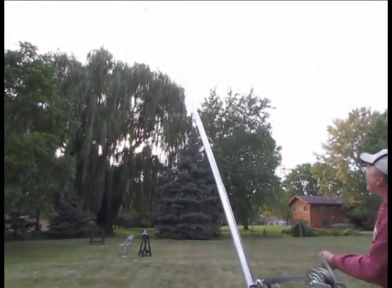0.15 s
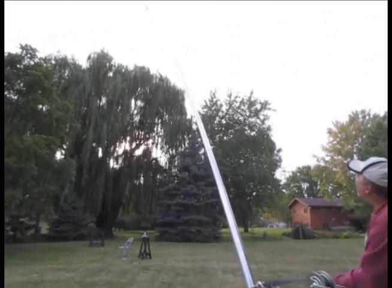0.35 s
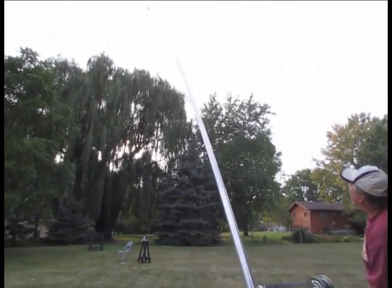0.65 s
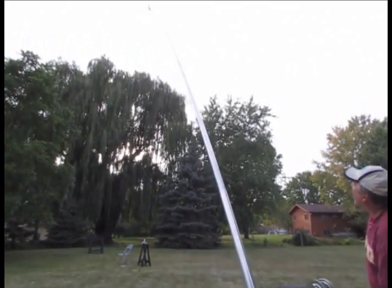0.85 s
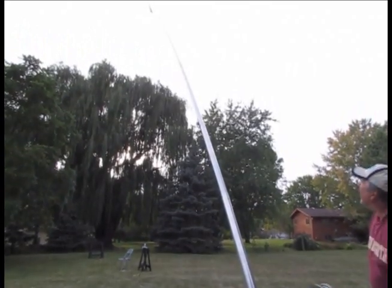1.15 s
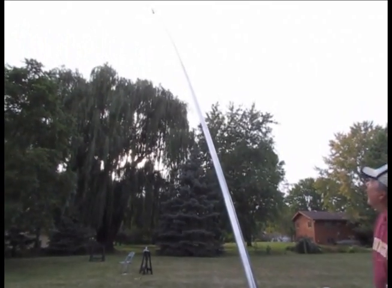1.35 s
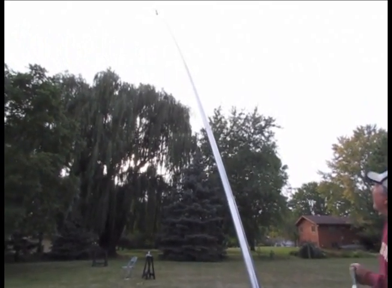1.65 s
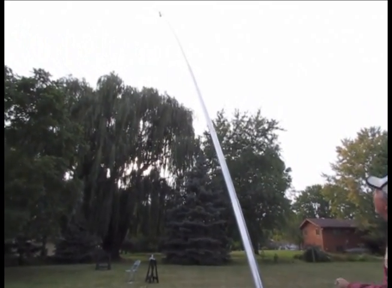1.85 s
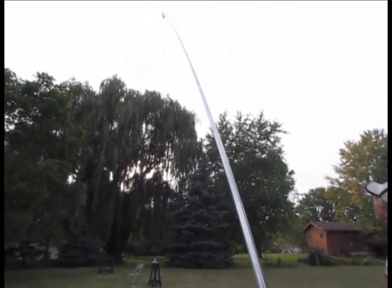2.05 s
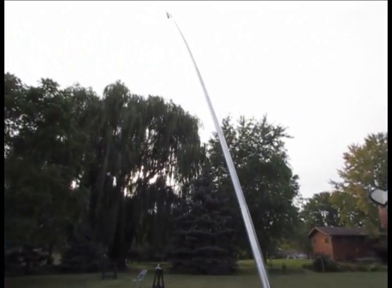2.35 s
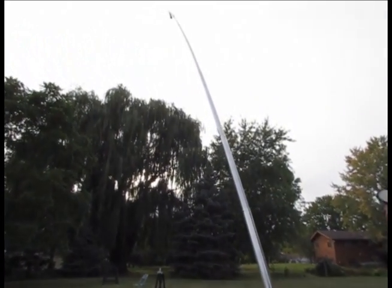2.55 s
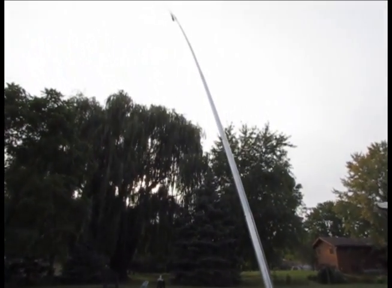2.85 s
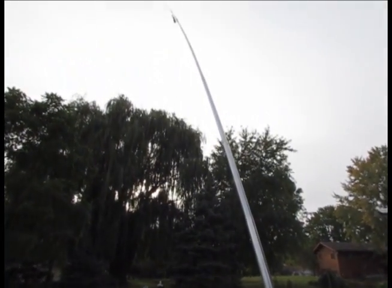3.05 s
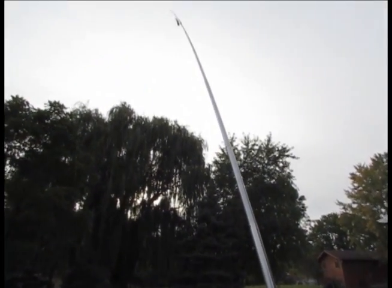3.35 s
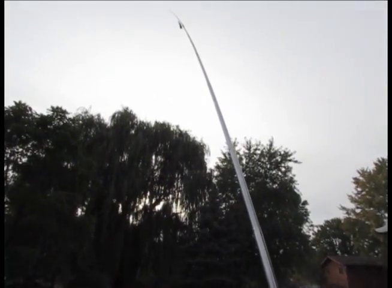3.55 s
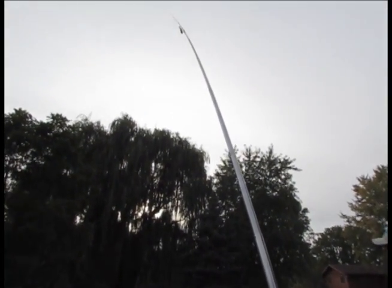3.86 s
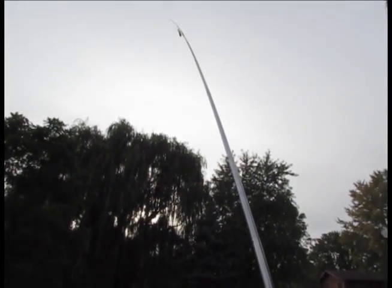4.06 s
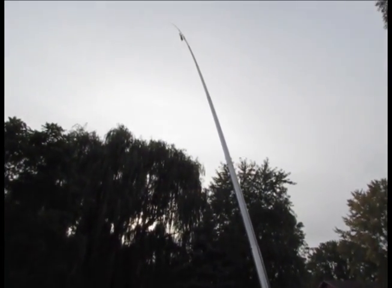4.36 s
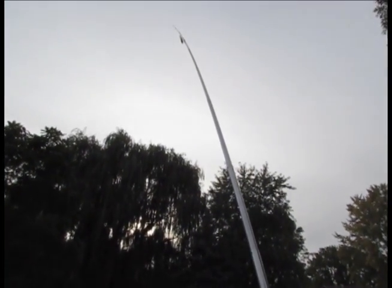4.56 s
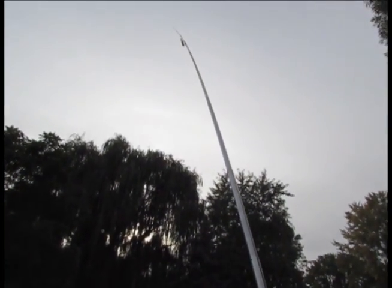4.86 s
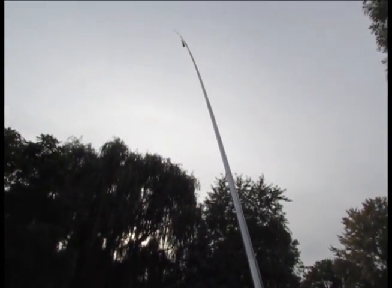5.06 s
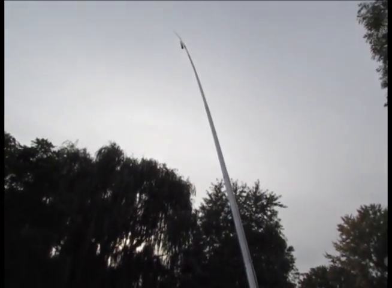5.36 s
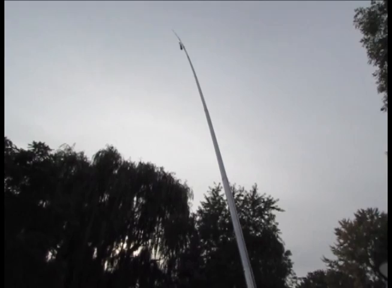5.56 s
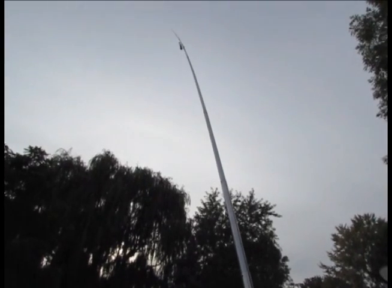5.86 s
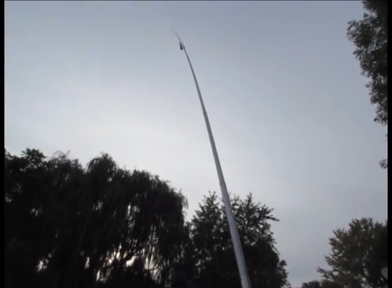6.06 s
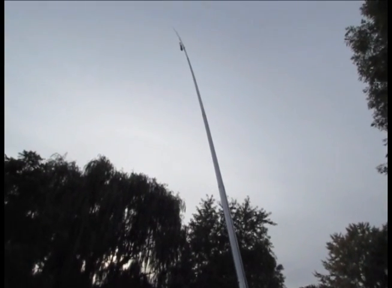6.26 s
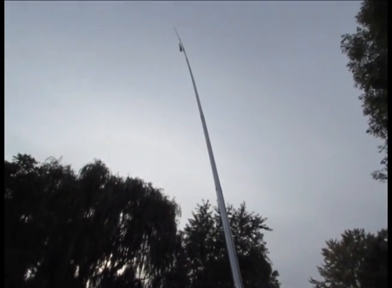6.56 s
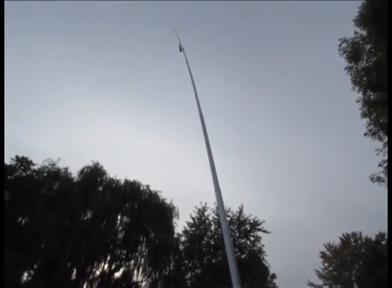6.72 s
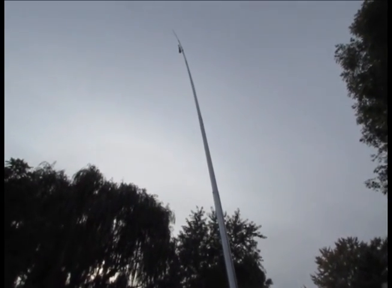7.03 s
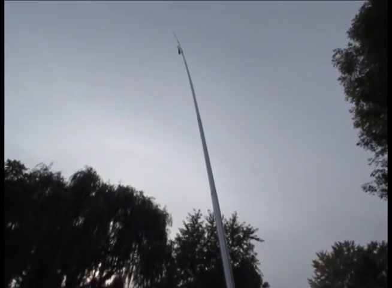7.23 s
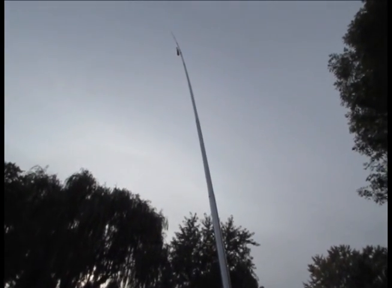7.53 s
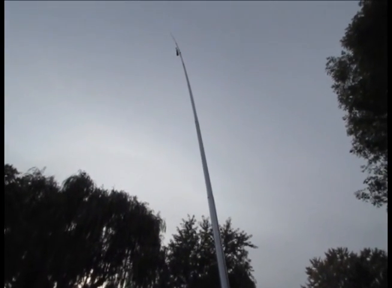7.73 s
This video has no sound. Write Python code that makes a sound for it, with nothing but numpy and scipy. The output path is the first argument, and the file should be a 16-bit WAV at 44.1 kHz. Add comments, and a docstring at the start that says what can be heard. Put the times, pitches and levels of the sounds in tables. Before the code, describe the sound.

Outdoors in a quiet yard, soft airy rush and a very faint low hum lie under a close hand winch. From 0.06 seconds to the end near 7.9, its pawl clacks over steel teeth, about eight or nine times a second with small irregularities. Every clack is a short scrape, a hard bright snap and a few milliseconds of chatter, coloured by a resonant steel frame. The first clicks are slightly weaker and brightest; the top softens by 2 seconds. Pace quickens around 3.5 to 3.9, then slows to about seven per second from 6 seconds, with weaker clicks after 7. Tone swells and thins with each crank turn. Faint ringing and gear rattle fill the gaps. Dull hollow knocks fall at 0.6 and 4.6; mast pings stand out near 1.9 and 2.9, fainter ones elsewhere. The winch sits slightly right, drifting towards centre late, with a short noisy tail, faint tree wash and distant slap echo.

```python
"""Quiet outdoor air and a low hum open the scene, and at once a hand winch under load raises a metal mast.
Its pawl scrapes up each ratchet tooth, drops and chatters: bursts of noise coloured by the steel frame.
Wheel and mast ring on faintly, gears rattle softly, and a few dull knocks and mast pings stand out.
Clicks turn fuller and thinner with every turn of the crank, and fill out as it speeds up.
The yard adds a short noise tail, a faint wash from the trees and one far echo."""
import sys
import numpy as np
from scipy import signal
from scipy.fft import rfft, irfft
from scipy.io import wavfile

SR = 44100
rng = np.random.default_rng(int(sys.argv[2]) if len(sys.argv) > 2 else 0)


def pcm_store(signal):
    """Save signal as 16-bit PCM."""
    levels = np.round(np.clip(np.atleast_2d(signal), -1, 1) * 32767)
    wavfile.write(sys.argv[1], SR, levels.astype(np.int16).T)


N = 347949
TIME = np.arange(N) / SR
TEETH = 15  # teeth on the ratchet wheel: one turn of the crank

# Where the pawl may land; one resonance stands out in each range:
# lowest_hz [Hz], highest_hz [Hz], width_hz [Hz], boost_db [dB]
SEAT_RANGES = [(2595, 4240, 117, 3), (5100, 8380, 310, 4.5), (10640, 13600, 240, 4)]


def amp(db):
    """Decibels to gain."""
    return 10 ** (np.asarray(db) / 20)


def read(points, hz):
    """A spectrum table, joined by straight lines over log frequency."""
    f, value = np.transpose(points)
    return np.interp(np.log(hz + 1), np.log(f + 1), value)


def glide(points, t):
    """A table of (s, value), joined by straight lines over time."""
    return np.interp(t, *np.transpose(points))


def add(mix, s, sound):
    """Mixes a sound in at time s."""
    part = mix[..., max(round(s * SR), 0):][..., :sound.shape[-1]]
    part += sound[..., :part.shape[-1]]


def bump(f, hz, width):
    """Bell of height 1 around a resonance."""
    return 1 / (1 + (2 * (f - hz) / width) ** 2)


def causal(db):
    """Minimum-phase response with the given gain: it rings only after the blow."""
    log_gain = np.log(amp(np.concatenate([db, db[-2:0:-1]])))
    return np.exp(np.conj(signal.hilbert(log_gain)))[:len(db)]


def widen(common, apart, same):
    """Left and right from two unrelated signals; same is their likeness, 0-1."""
    same = np.clip(same, 0, 1)
    return np.sqrt((1 + same) / 2) * common + np.sqrt((1 - same) / 2) * np.array([apart, -apart])


def air(same=0.82, hum_hz=100, waver_hz=1.23):
    """Air as shaped noise whose whole rush slowly swells, its lowest part a little less; a wavering hum."""
    # Noise density of the air: pitch_hz [Hz], density_db [dB per Hz], before the swell
    air_density = [(20, -106), (60, -96.5), (120, -93), (180, -99), (300, -93), (480, -100), (900, -99),
                   (2000, -102), (5000, -100), (8000, -105), (13000, -110), (16000, -125)]
    # Rise and fall of the rush: time_s [s], gain_db [dB]
    air_swell = [(0, 7.5), (.8, 0.5), (2.5, 1), (3.3, -0.5), (4.8, 1.5), (5.5, 3.5), (7, 0.5), (7.9, -1)]
    # Far hum: time_s [s], level_db [dB RMS]
    hum_level = [(0, -79), (1.2, -74.5), (2.5, -79), (3.5, -84), (7.9, -91)]
    f = np.fft.rfftfreq(N, 1 / SR)
    spectrum = rfft(rng.standard_normal((2, N))) * amp(read(air_density, f)) * np.sqrt(SR / 2)
    swelling_share = read([(400, 0.79), (1200, 1)], f)
    swelling = irfft(spectrum * swelling_share, N) * amp(glide(air_swell, TIME))
    steady = irfft(spectrum * (1 - swelling_share), N)
    common, apart = swelling + steady
    waver = np.interp(TIME, np.linspace(0, TIME[-1], 32), rng.standard_normal(32))
    hum = np.sqrt(2) * np.sin(2 * np.pi * np.cumsum(hum_hz + waver_hz * waver) / SR)
    hum *= amp(glide(hum_level, TIME))
    return widen(common, apart, same) + hum


def gears(per_s=22, tick_db=-48, ring_s=0.01, rise_s=0.00078, spread_db=8, size=2048):
    """Slack in the loaded gears makes faint soft rattles at random moments: band-passed noise puffs."""
    t = np.arange(size) / SR
    hits = (rng.random(N) < per_s / SR) * amp(spread_db * (rng.random(N) - .5))
    puff = np.exp(-t / ring_s) * (1 - np.exp(-t / rise_s))
    envelope = signal.oaconvolve(hits, puff)[:N]
    band = signal.butter(2, [2200, 6500], "bandpass", fs=SR)
    return amp(tick_db) * signal.lfilter(*band, envelope * rng.standard_normal((2, N)))


def frame_colour(f, progress, seat_db=0.76, detune=0.018):
    """Gain of the steel frame in dB; each tooth loads its resonances a little differently."""
    # Broad colour of the struck winch: pitch_hz [Hz], gain_db [dB]
    steel = [(100, -42), (400, -28.5), (620, -22.5), (800, -17), (1900, -10), (2500, -1.5), (3300, -3.5),
             (5800, 2.5), (8300, -4), (11400, -8.5), (12700, -4.5), (14600, -11.5), (16000, -34)]
    # Damped resonances, shifting in strength as the mast rises:
    # pitch_hz [Hz], width_hz [Hz], start_db [dB], end_db [dB], each before the chance per tooth
    resonances = [(747.6, 150, 13, 10.5), (840, 30, 3.5, 4), (1110, 45, 2.5, -1.5), (1417, 110, 10, 4),
                  (1560, 204, 2.5, 12), (2325, 130, 4, 7.5), (2775, 138, 11, 6), (3872, 270, 8, 9),
                  (4804, 76, 11, 8.5), (5560, 220, 2, 5), (6420, 930, 0, 3), (7310, 280, 3.5, 2.5),
                  (9110, 194, 7, 8), (9930, 180, 9.5, 8.5)]
    hz, width, start_db, end_db = np.transpose(resonances)
    chance = rng.standard_normal((len(resonances), 2))
    db = start_db + (end_db - start_db) * progress + seat_db * chance[:, 0]
    return read(steel, f) + bump(f[:, None], hz * (1 + detune * chance[:, 1]), width) @ db


def blow_colour(f, tooth, pace, heavy_tooth=14):
    """Colour of one blow in dB: fuller on the heavy side of the turn and when the crank runs fast."""
    # Colour by band: pitch_hz [Hz], mean_db [dB], heavy_db [dB at the tooth where the crank bears hardest],
    # pace_db [dB per doubling of pace], chance_db [dB, standard deviation]
    blow = [(740, -0.5, 0.7, 1.3, 0.5), (1260, 1.7, 2.5, -0.5, 0.85), (3000, 1.04, 0.1, 2, 0.55),
            (6250, 0.62, 0.15, 0, 0.4), (11500, 1.15, 0.4, 0.3, 0.65)]
    hz, mean_db, heavy_db, pace_db, chance_db = np.transpose(blow)
    heavy = np.cos(2 * np.pi * (tooth - heavy_tooth) / TEETH)
    db = mean_db + heavy * heavy_db + pace * pace_db + chance_db * rng.standard_normal(len(hz))
    return read(np.column_stack([hz, db]), f)


def seat_colour(f, wear, slip=0.23):
    """Each tooth seats the pawl in its own way, a little differently at every turn."""
    low_hz, high_hz, width, db = np.transpose(SEAT_RANGES)
    place = np.clip(wear + slip * (rng.random(len(SEAT_RANGES)) - .5), 0, 1)
    return bump(f[:, None], low_hz * (high_hz / low_hz) ** place, width) @ db


def chatter(t, length, count=6, contact_s=0.00046, bounce_db=-5, loss_db=2.5):
    """Force of one tooth: the drop of the pawl, then uneven, on the whole weakening bounces."""
    ring_s, ring_share, uneven_db = .0032, .28, 9  # each blow shakes the frame for a while
    chance = rng.random((count, 2))
    bounces = (np.arange(count) + .3 + .7 * chance[:, 0]) / count * length * 1.6
    sizes = amp(bounce_db + uneven_db * chance[:, 1] - loss_db * bounces / length)
    age = t - np.append(0, bounces)[:, None]
    since = np.maximum(age, 0)
    blows = (age >= 0) * (np.exp(-since / contact_s) + ring_share * np.exp(-since / ring_s))
    return np.sqrt(np.append(1, sizes) ** 2 @ blows)  # blows add as energy


def ratchet(size=4096, scrape_s=0.0033, hard_s=0.0048):
    """Every tooth excites the steel frame; two versions of the rattle share timing but not noise."""
    # Drops of the pawl: start_s [s], level_db [dB RMS over 25 ms, before the winch gain],
    # chatter_s [s, sets the spacing and fading of the bounces]
    drops = [(0.0636, -22, 0.0087), (0.1843, -22, 0.0037), (0.299, -22, 0.0017), (0.4039, -22.5, 0.0027),
             (0.516, -22.5, 0.0071), (0.6102, -22.5, 0.0068), (0.7056, -21.5, 0.0099),
             (0.8396, -21, 0.0059), (0.9873, -20.5, 0.0082), (1.1171, -21, 0.0052), (1.2343, -19.5, 0.0053),
             (1.3384, -20.0, 0.0059), (1.4466, -20.0, 0.0073), (1.5645, -21, 0.0064), (1.6818, -20, 0.0058),
             (1.793, -20.5, 0.0068), (1.8964, -21.5, 0.0057), (2.0036, -21.5, 0.0071),
             (2.0996, -20.5, 0.0064), (2.198, -20.5, 0.0086), (2.3055, -19.5, 0.0086),
             (2.3971, -19, 0.0071), (2.5073, -19.5, 0.0071), (2.6354, -20, 0.007), (2.7638, -20.5, 0.0075),
             (2.8892, -20, 0.0052), (2.9995, -20, 0.0061), (3.109, -19.5, 0.0063), (3.2421, -21.5, 0.006),
             (3.3519, -21.5, 0.0051), (3.452, -21, 0.0068), (3.545, -21.5, 0.0061), (3.6305, -21, 0.0065),
             (3.7136, -20, 0.008), (3.7971, -19.5, 0.0078), (3.889, -19.5, 0.0061), (3.9898, -20.5, 0.0054),
             (4.1142, -20, 0.0079), (4.2543, -20.5, 0.0059), (4.3827, -20.5, 0.0087), (4.4955, -19, 0.0062),
             (4.6002, -20.0, 0.005), (4.6986, -19.5, 0.0053), (4.8205, -21, 0.0056),
             (4.9362, -20.5, 0.0067), (5.0551, -21, 0.0095), (5.1637, -19.5, 0.0076),
             (5.2734, -20.5, 0.0066), (5.3868, -20, 0.0073), (5.5111, -19, 0.0072), (5.6317, -18, 0.0064),
             (5.743, -19.0, 0.01), (5.8843, -19.0, 0.0085), (6.0465, -19, 0.0052), (6.196, -19.5, 0.0062),
             (6.347, -19, 0.0074), (6.4945, -20, 0.007), (6.6377, -19, 0.0027), (6.784, -20.5, 0.0085),
             (6.9112, -19.5, 0.0064), (7.0273, -21.5, 0.0038), (7.1526, -22.5, 0.0051),
             (7.2788, -22, 0.0045), (7.4127, -22.5, 0.0085), (7.5592, -21.5, 0.005),
             (7.7102, -21.5, 0.0063), (7.8542, -20.5, 0.0052)]
    lead_in, span = .012, .025  # s of scrape room before the drop, s over which level is set
    usual_pace = 8.5  # teeth per s
    scrape_mean_db, scrape_pace_db, scrape_chance_db = -20, 4, 5  # pace: dB per doubling
    hard_share = [(3000, 0), (7000, 0.42), (13000, 0.99)]  # Hz, extra share
    scrape_tone = [(1000, 3.5), (2500, 3), (6000, 1), (12000, -5)]  # Hz, dB
    t, f = np.arange(size) / SR - lead_in, np.fft.rfftfreq(size, 1 / SR)
    out = np.zeros((2, N))
    wear = rng.random((TEETH, len(SEAT_RANGES)))
    paces = -np.log2(np.gradient(np.transpose(drops)[0]) * usual_pace)  # doublings of the usual pace
    for tooth, ((s, db, length), pace) in enumerate(zip(drops, paces)):
        colour_db = frame_colour(f, s / TIME[-1])
        colour_db = colour_db + blow_colour(f, tooth, pace)
        colour_db = colour_db + seat_colour(f, wear[tooth % TEETH])
        grit = rng.standard_normal((2, size))
        blows = chatter(t, length) * grit
        # the first drop is the hardest contact, so it carries most of the top
        hard = rfft(blows * np.exp(-abs(t) / hard_s)) * read(hard_share, f)
        # riding up the tooth is a softer, duller contact that swells until the drop
        scrape_db = scrape_mean_db + scrape_pace_db * pace + scrape_chance_db * rng.standard_normal()
        climb = (t < 0) * np.exp(-abs(t) / scrape_s) * grit
        scrape = rfft(climb) * amp(scrape_db + read(scrape_tone, f))
        click = irfft((rfft(blows) + hard + scrape) * causal(colour_db))
        rms = np.sqrt((click ** 2).sum(1, keepdims=True) / (span * SR))
        add(out, s - lead_in, amp(db) * click / rms)
    return out


def ringing(clicks):
    """Lightly damped modes of wheel and mast, driven by the clicks, sing on between them."""
    # Long modes: pitch_hz [Hz], start_db [dB gain], end_db [dB gain], t60_s [s]
    long_modes = [(782, -62, -63, .25), (1410, -65, -66, .22), (1510, -74, -62, .2), (1970, -71, -75, 1.0),
                  (2200, -70, -85, .6), (2970, -84, -66, .6), (3138, -73, -70, 1.0), (4075, -66, -80, .6),
                  (4668, -68, -76, .7), (6490, -73, -76, .5), (8580, -74, -76, .6), (13520, -69, -70, .4)]
    t, out = np.arange(SR) / SR, np.zeros((2, N))
    for hz, start_db, end_db, t60 in long_modes:
        mode = amp(-60 * t / t60) * np.sin(2 * np.pi * hz * t)
        sung = signal.oaconvolve(clicks, mode[None], axes=1)[:, :N]
        out += amp(np.linspace(start_db, end_db, N)) * sung
    return out


def ports(pair, lead_ahead=.6, lead_per_db=0.1555, detour_from_db=1.0, detour_per_db=1.0):
    """The winch stands off to the side: the two ports differ in phase, level and fine detail."""
    # Likeness of the two ports: pitch_hz [Hz], likeness [0-1]
    likeness = [(700, .95), (1500, .92), (2700, .93), (4000, .77), (5500, .66), (8000, .7), (14000, .77)]
    # Phase by which left leads, before the moving lead factor: pitch_hz [Hz], phase_rad [rad]
    lead_phase = [(200, -1.1), (800, 0.2), (1500, -0.81), (2750, -1.49), (4000, -1.27), (5500, 0.27),
                  (7500, 0.49), (10000, 0.8)]
    # Fixed level offset, to which the shade is added: pitch_hz [Hz], left_minus_right_db [dB]
    balance = [(1500, 0.29), (3000, -1.7), (5200, -0.22), (7000, 0.34), (12000, 1)]
    # The winch lies to the right, then slips under the camera:
    # time_s [s], left_minus_right_db [dB, before the share per band]
    aim = [(0, -1.5), (2.1, -2), (2.8, -2.5), (4.4, -3.5), (5.3, -2), (6.5, -1.5), (7.9, 1)]
    # Band in which the camera body bends the path to the left port: pitch_hz [Hz], share [rad per unit]
    detour_band = [(4000, 0.037), (5500, 0.89), (8000, 0.64), (9200, 1), (10200, 0.17)]
    # The camera tilts up, away from the winch: time_s [s], treble_db [dB, before the share per band]
    tilt = [(0, 10), (1.3, 4.5), (2.1, -3.5), (7.9, -3.5)]
    shade_share = [(1500, 0.41), (4500, 0.88)]  # Hz, share of the shade
    off_axis_share = [(9500, 0.16), (12500, 0.53)]  # Hz, share of the tilt
    f, t, (common, apart) = signal.stft(pair, SR, nperseg=256)
    shade_db = glide(aim, t)
    # the deeper the left port lies in the shade of the camera body, the more the phases part
    lead = lead_ahead - lead_per_db * shade_db
    detour = detour_per_db * np.maximum(-shade_db - detour_from_db, 0)
    z = widen(common, apart, read(likeness, f)[:, None])
    balance_db = read(balance, f)[:, None] + np.outer(read(shade_share, f), shade_db)
    # off axis, the microphone loses its highest treble
    off_axis_db = np.outer(read(off_axis_share, f), glide(tilt, t))
    phase = np.outer(read(lead_phase, f), lead) - np.outer(read(detour_band, f), detour)
    side = np.array([1, -1])[:, None, None]  # left, right: each takes half the difference
    z = z * amp(side * balance_db / 2 + off_axis_db) * np.exp(.5j * side * phase)
    return signal.istft(z, SR, nperseg=256)[1][:, :N]


def scatter(same, t60, level_db, rise_s=0.0042):
    """A stereo noise tail of many small reflections, each band dying at its own speed."""
    common, apart = rng.standard_normal((2, SR))
    f, t, z = signal.stft(widen(common, apart, same), SR, nperseg=256)
    decay = read(t60, f)[:, None]
    even_energy = np.sqrt(2 * np.log(1000) / (decay * SR))  # long and short decays weigh alike
    z *= amp(read(level_db, f)[:, None] - 60 * t / decay) * even_energy
    return signal.istft(z, SR, nperseg=256)[1][:, :SR] * np.clip(np.arange(SR) / SR / rise_s, 0, 1)


def yard(winch, count=6, echo_s=.092, echo_db=-32, near_same=0.86, trees_same=0.076):
    """Noise tails, crossfading in rotation, for near scatter and trees; a delayed slap from a far wall."""
    # Decay of the near yard: pitch_hz [Hz], t60_s [s]
    near_decay = [(500, 0.25), (1500, 0.1), (4000, 0.17), (9000, 0.2), (15000, 0.2)]
    # Strength of the near tail: pitch_hz [Hz], level_db [dB]
    near_level = [(700, -6.5), (1500, -3), (3000, -14), (6000, -13), (10000, -9.5), (14000, -13)]
    # Decay of the wash from the trees: pitch_hz [Hz], t60_s [s]
    trees_decay = [(3000, 1.5), (14000, 2.5)]
    # Strength of that wash: pitch_hz [Hz], level_db [dB]
    trees_level = [(700, -18), (5000, -25), (14000, -72)]
    out = np.zeros((2, N))
    for k in range(count):
        # moves to the next of the six tails eight times per second
        turn = (TIME * 8 - k + count / 2) % count - count / 2
        share = np.cos(np.pi / 2 * np.clip(turn, -1, 1))
        tail = scatter(near_same, near_decay, near_level) + scatter(trees_same, trees_decay, trees_level)
        out += signal.oaconvolve((winch * share)[None], tail, axes=1)[:, :N]
    slap = signal.lfilter(*signal.butter(1, 9000, fs=SR), winch)
    add(out, echo_s, amp([[echo_db + 3], [echo_db - 2]]) * slap)  # stronger on the left
    return out


def knocks(rise_s=0.0025):
    """The mount's damped modes answer a shift of the load with a short hollow knock."""
    # Dull knocks as the load settles: start_s [s], level_db [dB gain on the mount modes]
    shifts = [(.607, -41), (4.599, -38.5)]
    # Modes of the mount: pitch_hz [Hz], level_db [dB within the knock], t60_s [s]
    mount_modes = [(442, -5, 0.056), (496, 5.5, 0.028), (546, -3, 0.061), (893, 0.5, 0.047)]
    t, out = np.arange(SR // 5) / SR, np.zeros(N)
    knock = sum(amp(db - 60 * t / t60) * np.cos(2 * np.pi * hz * t) for hz, db, t60 in mount_modes)
    for s, db in shifts:
        add(out, s, amp(db) * knock * (1 - np.exp(-t / rise_s)))
    return out


def pings(hz=1424, t60=0.2, rise_s=0.0049):
    """The mast's strongest mode, struck through the mount; a close twin makes it beat."""
    # Teeth that catch hard enough to make the mast ping: start_s [s], level_db [dB gain on the mode pair]
    catches = [(1.236, -43), (1.897, -34), (2.892, -33.5), (3.455, -46), (3.713, -42), (4.497, -39.5)]
    t, out = np.arange(SR // 2) / SR, np.zeros(N)
    for s, db in catches:
        twin_hz = hz * (1 - .04 * rng.random())
        pair = .75 * np.sin(2 * np.pi * hz * t) + .5 * np.sin(2 * np.pi * twin_hz * t)
        add(out, s, amp(db - 60 * t / t60) * pair * (1 - np.exp(-t / rise_s)))
    return out


def scene(winch_db=-1.59):
    """The winch close by, the mast and its mount, the yard around them."""
    clicks = amp(winch_db) * ratchet()
    winch = clicks + ringing(clicks) + gears()
    mast = knocks() + pings()
    return ports(winch) + mast + yard(winch[0] + mast) + air()


def record(dry, edge_hz=16200):
    """The recorder's band limit: a steep low-pass."""
    low_pass = signal.firwin(511, edge_hz, window=("kaiser", 9), fs=SR)
    return signal.oaconvolve(dry, low_pass[None], "same")


dry = scene()
out = record(dry)
pcm_store(out)
```